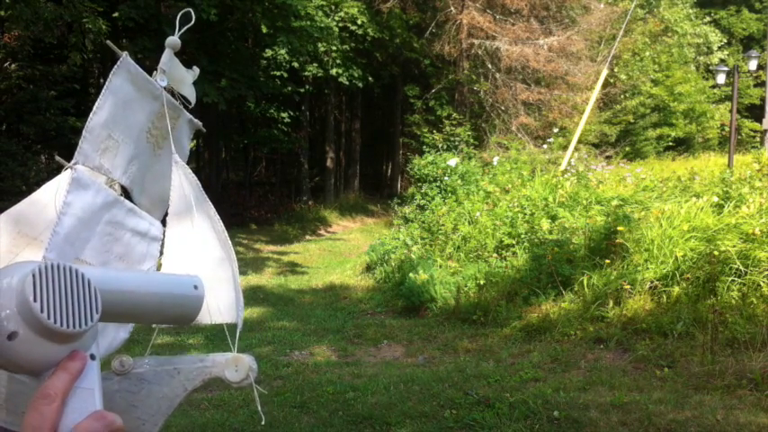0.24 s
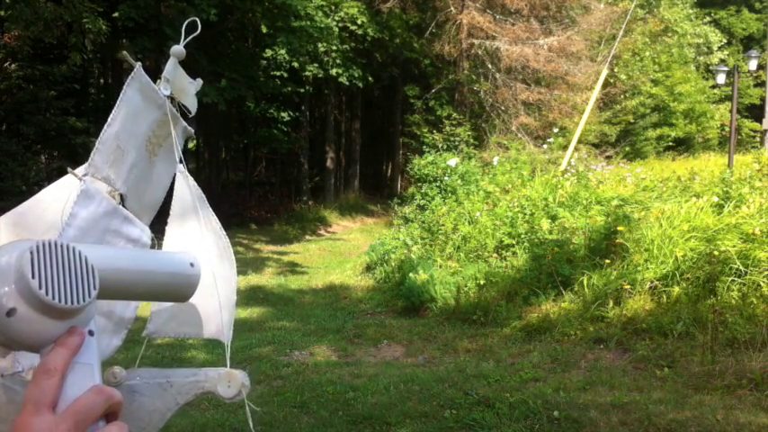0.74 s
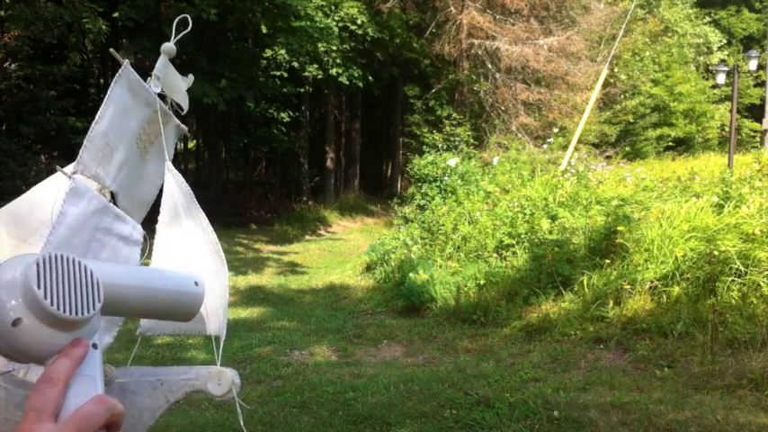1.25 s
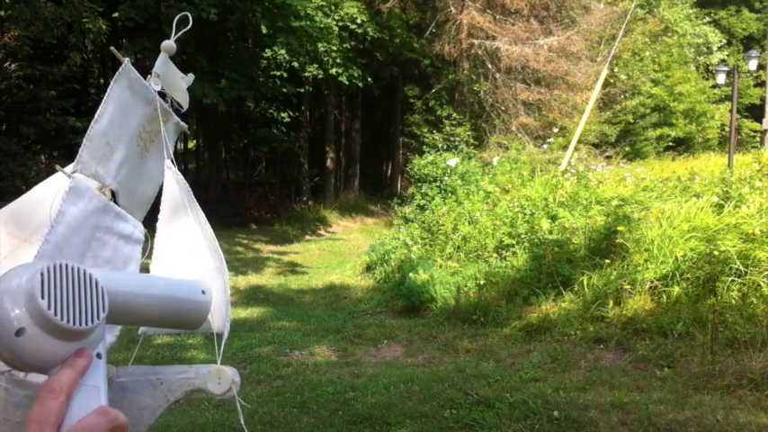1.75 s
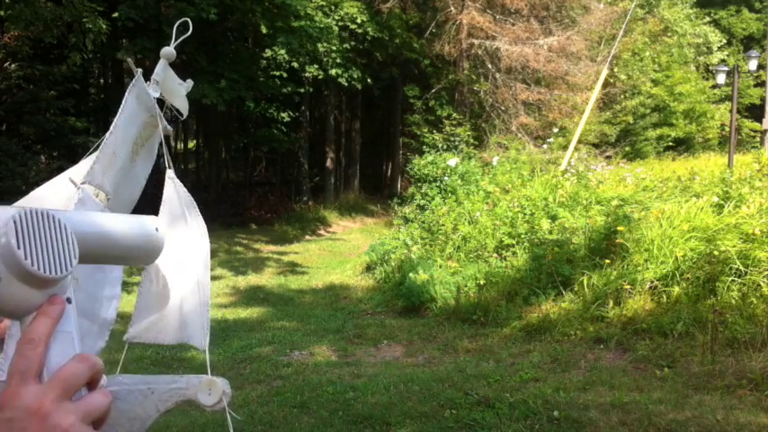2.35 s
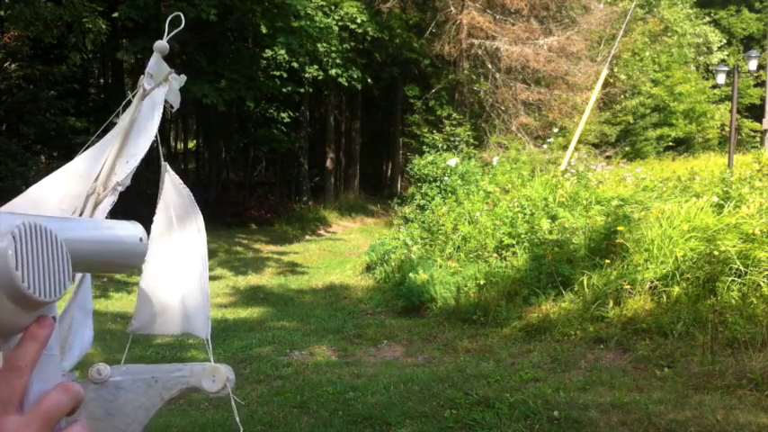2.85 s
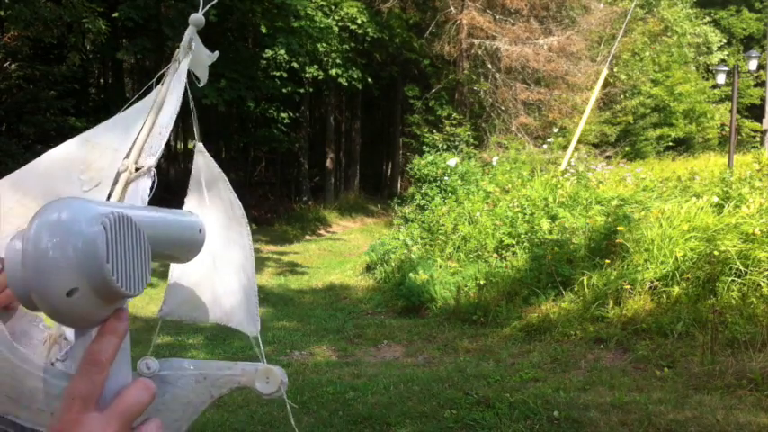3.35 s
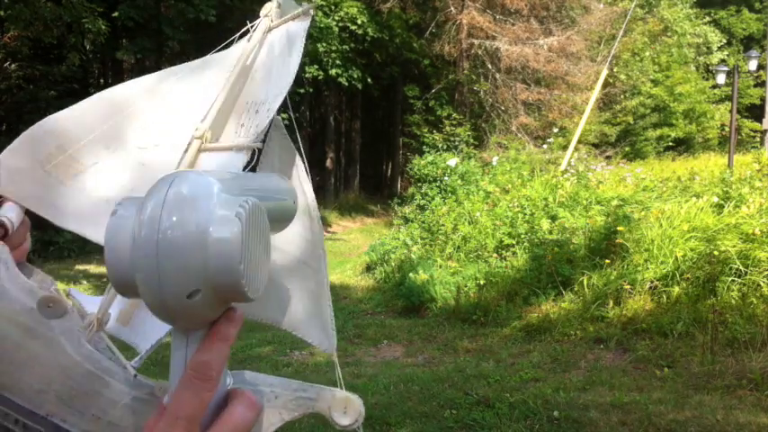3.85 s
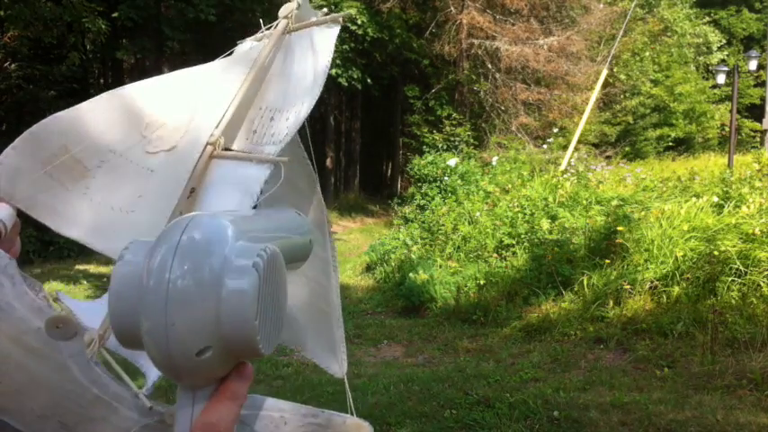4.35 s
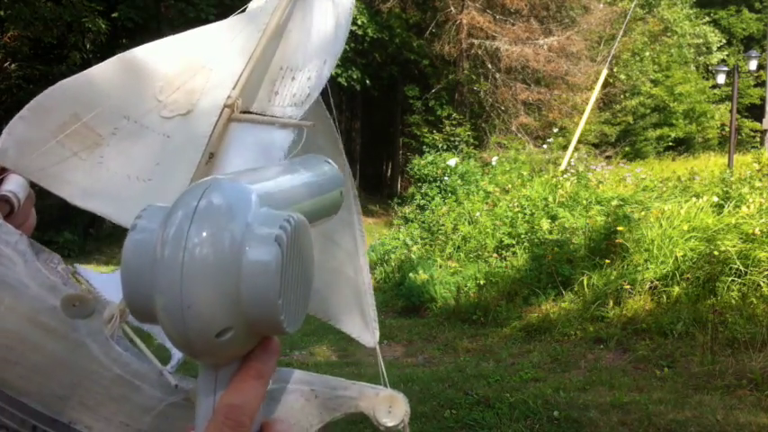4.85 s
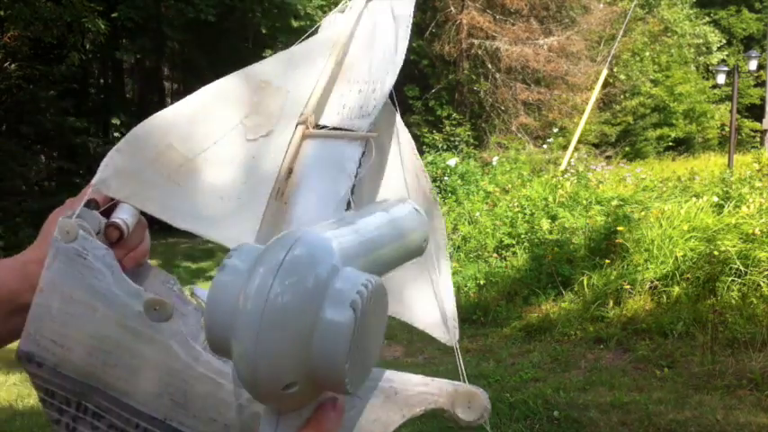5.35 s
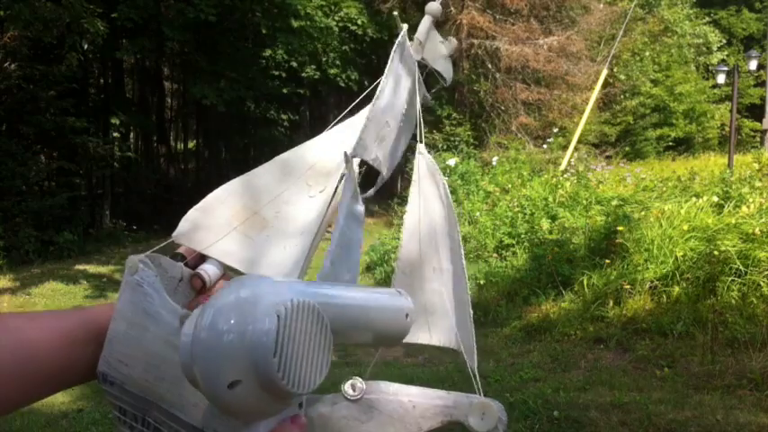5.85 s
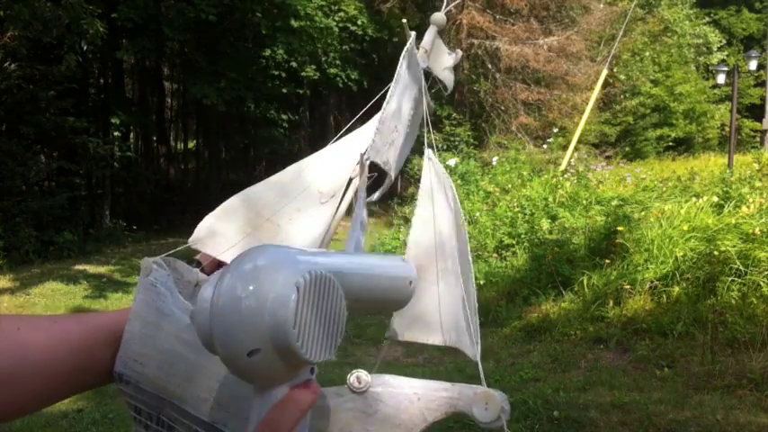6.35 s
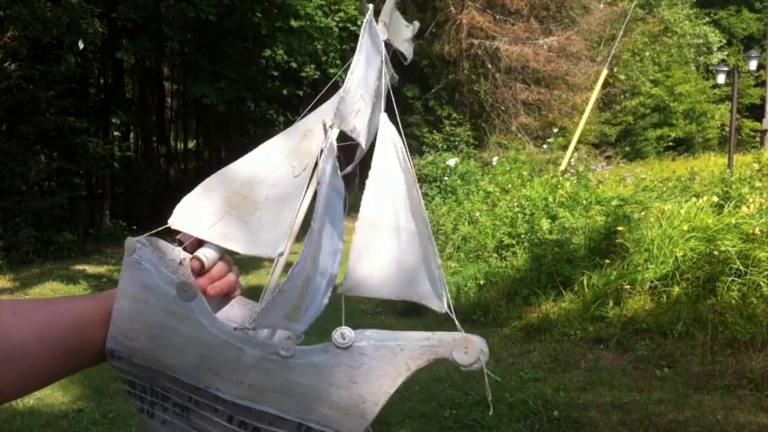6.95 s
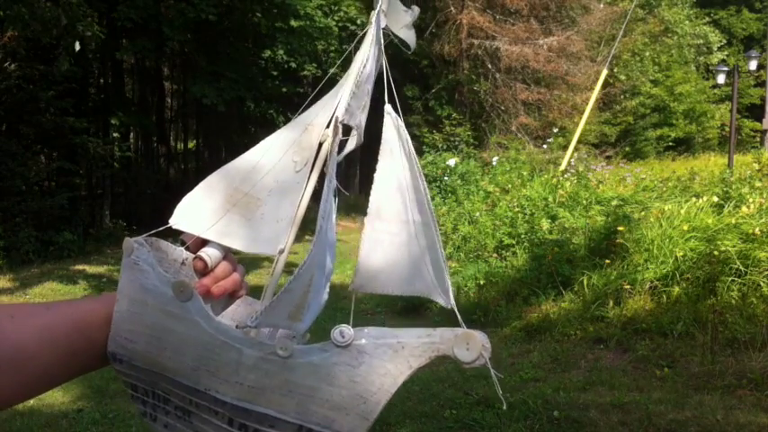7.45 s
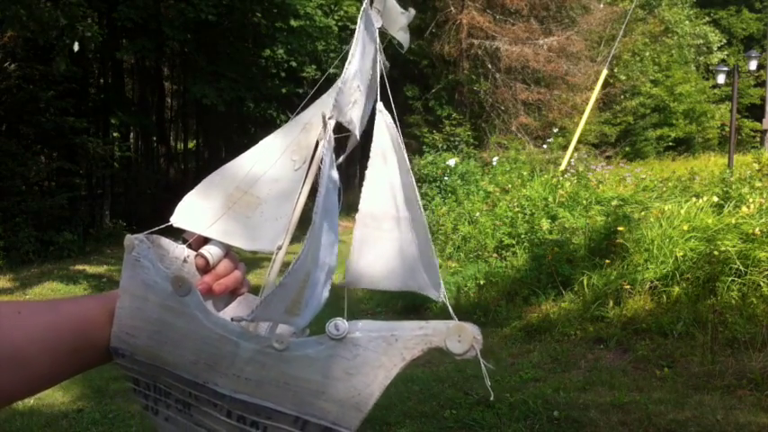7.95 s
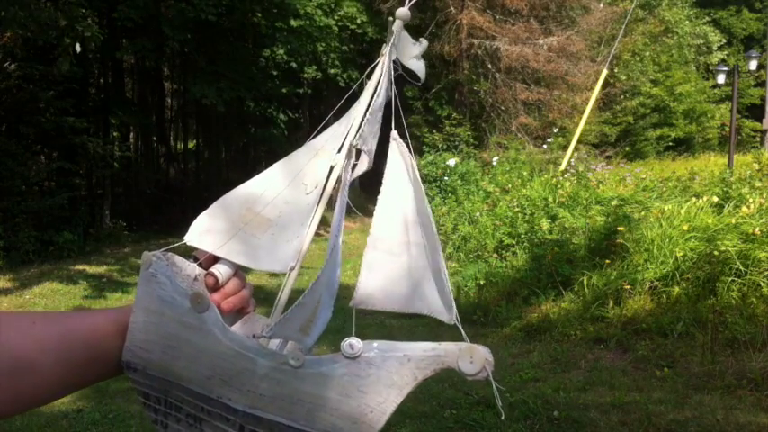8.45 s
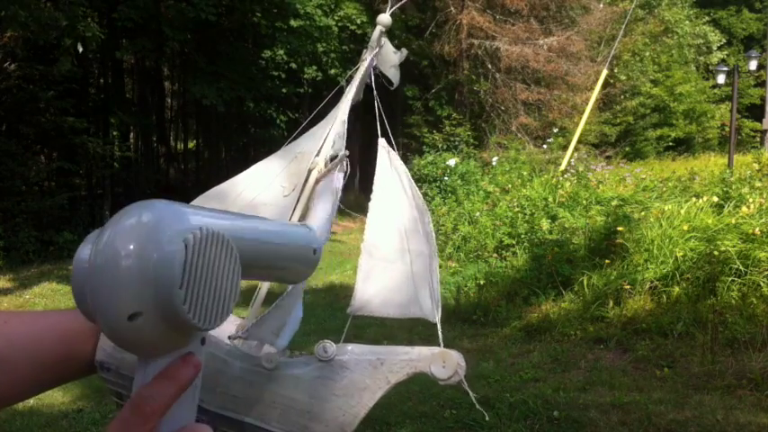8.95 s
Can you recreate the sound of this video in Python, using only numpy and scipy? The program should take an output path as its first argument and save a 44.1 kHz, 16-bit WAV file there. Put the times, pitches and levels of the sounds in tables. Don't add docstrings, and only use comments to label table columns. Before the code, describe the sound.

A handheld hair dryer rushes and whines close by, its tone shifting as it turns, winds down, then snaps back on outdoors.

```python
import sys
import numpy as np
from scipy import signal
from scipy.fft import rfft, irfft, next_fast_len
from scipy.io import wavfile
from scipy.ndimage import uniform_filter1d, map_coordinates

SR = 44100
rng = np.random.default_rng(int(sys.argv[2]) if len(sys.argv) > 2 else 0)


def log_audio(samples):
    frames = np.atleast_2d(samples).T
    limited = np.clip(frames, -1, 1)
    pcm = np.round(limited * 32767).astype(np.int16)
    wavfile.write(sys.argv[1], SR, pcm)


def decibels_to_gain(level_db):
    exponent = np.asarray(level_db, float) / 20
    return 10 ** exponent


N = 405279
TOP_HZ = 15740
RUN_HZ = 178.05


def unit(x):
    return x / np.sqrt(np.mean(x ** 2) + 1e-20)


def along(points, hz):
    point_hz, values = np.transpose(points)
    return np.interp(np.log(hz + 1), np.log(point_hz + 1), values)


def curves(rows, t):
    times, *columns = np.transpose(rows)
    return [np.interp(t, times, column) for column in columns]


def wobble(rate):
    knots = rng.standard_normal(int(N * 90 / SR) + 4)
    return map_coordinates(knots, [np.arange(N) * min(rate, 90) / SR])


def patches(shape, size):
    field = rng.standard_normal(shape)
    for axis in (0, 1, 0, 1):
        field = uniform_filter1d(field, size[axis], axis)
    return unit(field)


def shaped_noise(gain_at):
    m = next_fast_len(N)
    spectrum = rfft(rng.standard_normal(m)) * gain_at(np.fft.rfftfreq(m, 1 / SR))
    return unit(irfft(spectrum, m)[:N])


# pitch_hz, level_db (per Hz)
LEAVES = [(25, -45), (50, -26), (100, -4.5), (250, -3), (800, -10), (2300, -10), (5300, -24), (8500, -7),
          (15700, -21)]
# start_s, peak_db, pitch_hz
CRICKET_NOTES = [(8.0311, -39, 5300), (8.0464, -39, 5180), (8.0721, -36, 5850), (8.106, -37, 5400),
                 (8.1244, -43, 5270), (8.1534, -38, 5820), (8.1624, -44, 5410), (8.2167, -43, 5430),
                 (8.2442, -43, 5250), (8.2824, -46, 5190), (8.3165, -36, 5440), (8.3514, -40, 5390),
                 (8.4188, -39, 5850)]


def garden():
    out = decibels_to_gain(-48) * shaped_noise(lambda hz: decibels_to_gain(along(LEAVES, hz)))
    chorus_hz, width_hz = 5450, 280
    chorus = shaped_noise(lambda hz: np.exp(-0.5 * ((hz - chorus_hz) / width_hz) ** 2))
    out += decibels_to_gain(-59 + 4.4 * wobble(28)) * chorus
    t = np.arange(round(0.019 * SR)) / SR
    for start_s, peak_db, pitch_hz in CRICKET_NOTES:
        note = np.hanning(len(t)) * np.sin(2 * np.pi * pitch_hz * (t - 1.2 * t * t))
        out[round(start_s * SR):][:len(t)] += decibels_to_gain(peak_db - 8) * note
    return out


# start_s, peak_db
CONTACTS = [
    (8.3903, -24),
    (8.3918, -22),
]


def switch():
    out, t = np.zeros(N), np.arange(SR // 20) / SR
    for start_s, peak_db in CONTACTS:
        crack = 0.51 * decibels_to_gain(-60 * t / 0.006) * np.diff(rng.standard_normal(len(t) + 1))
        knock = 0.17 * decibels_to_gain(-60 * t / 0.018) * np.sin(2 * np.pi * 700 * t)
        out[round(start_s * SR):][:len(t)] += decibels_to_gain(peak_db) * (crack + knock)
    return out


def shaft(t):
    off_s, coast_s, on_s, spin_up_s = 7.587, 0.28, 8.39, 0.15
    run_hz = RUN_HZ - 0.175 * t
    coast = 1 / (1 + np.clip(t - off_s, 0, on_s - off_s) / coast_s)
    missing = (1 - coast) * np.exp(-np.maximum(t - on_s, 0) / spin_up_s)
    return run_hz * (1 - missing)


# time_s, turn (intake 0 side-on, 1 slanted, 2 facing, 3 lowered),
# aimed (barrel along the line of sight, 0-1), sail_echo_lag_ms, echo_strength (0-1)
HAND_PATH = [(0, 0, 0, 0.33, 0.2), (.7, 0.1, 0.28, .28, 0), (2.2, 0.18, 0.35, .285, 0.07),
             (2.7, 0.3, 0.4, 0.444, .25), (3.1, .5, 0.2, 0.47, 0.1), (3.5, 1.3, 0.67, .468, 0.3),
             (3.85, 2.27, 0.5, .535, 0.1), (4.4, 2.5, 0.8, 0.45, 0), (5.0, 2.5, 1, 0.56, .3),
             (5.5, 2.5, 0.88, 0.53, 0.3), (5.8, 2.1, 0.7, 0.6, 0.1), (6.1, 0.9, 0.1, 0.43, 0.2),
             (6.6, 1.1, 0.4, 0.49, .2), (6.9, 1.85, 0.07, 0.5, 0.16), (7.2, 2.5, 0.93, 0.51, 0),
             (8.5, 4.5, 0.8, 0.42, 0), (8.8, 2.46, 0.53, 0.35, 0.1), (9.19, 0.5, 0.14, 0.29, 0.2)]


def by_turn(values, t):
    turn = np.clip(curves(HAND_PATH, t)[0], 0, 3)
    shares = [np.clip(1 - abs(turn - k), 0, 1) for k in range(len(values))]
    return sum(np.multiply.outer(value, share) for value, share in zip(values, shares))


# time_s, gain_db
NEARNESS = [(0, 0), (3.2, 0), (4.5, 0), (5.8, 0), (6.72, 0), (6.87, 1), (7.1, 0), (8.3, -1.5), (8.5, -1),
            (8.8, 3), (9.19, 1.5)]


def near_db(t):
    return curves(NEARNESS, t)[0]


# multiple (of the shaft speed), side_on_db, slanted_db, facing_db, lowered_db
STRONG_TONES = [
    (1, -54, -44, -46, -46),
    (12, -25, -27, -30, -24),
    (24, -27.5, -39, -38, -37),
    (40, -56, -31, -37, -43),
]
STRONG_AIMED_GAIN = [
    6.5,
    -2,
    1.5,
    1,
]
# multiple (of the shaft speed), side_on_db, slanted_db, facing_db, lowered_db
WEAK_TONES = [(5, -51, -34, -54, -41), (6, -47, -43, -55, -49), (13, -38, -37, -48, -34),
              (30, -38, -45, -49, -42), (33, -40, -56, -50, -60), (34, -41, -42, -47, -55),
              (35, -40, -42, -42, -48), (39, -52, -48, -43, -51), (41, -50, -43, -51, -63),
              (45, -45, -47, -48, -52), (54, -44, -50, -53, -58), (55, -51, -46, -48, -51),
              (60, -39, -48, -52, -71), (65, -59, -40, -46, -64), (2, -50, -50, -50, -50)]


def motor():
    t = np.arange(N) / SR
    shaft_hz, aimed = shaft(t), curves(HAND_PATH, t)[1]
    unsteady_hz = shaft_hz + 0.2 * wobble(12) + 0.15 * wobble(2.5)
    phase = 2 * np.pi * np.cumsum(unsteady_hz) / SR
    decades = np.log10(shaft_hz / RUN_HZ)
    out = np.zeros(N)
    for (multiple, *seen_db), aimed_db in zip(STRONG_TONES, STRONG_AIMED_GAIN):
        flicker_db = (0.8 + (multiple / 24) ** 2) * wobble(5)
        scattered = 0.36 * (multiple > 1) * (wobble(70) + 1j * wobble(70))
        level_db = by_turn(seen_db, t) + aimed_db * aimed + near_db(t) + 110 * decades + flicker_db
        wave = np.real((1 + scattered) * np.exp(1j * multiple * phase))
        out += np.sqrt(2) * decibels_to_gain(level_db) * wave
    for multiple, *seen_db in WEAK_TONES:
        level_db = by_turn(seen_db, t) + 70 * decades + 2.5 * wobble(14)
        wave = np.sin(multiple * phase + 2 * np.pi * rng.random())
        out += np.sqrt(2) * decibels_to_gain(level_db) * wave
    return out


def echoes(hz, t):
    shape, size = (len(hz), len(t)), (3, 13)
    scatter = 0.25 * np.clip(hz / 9000, 0.3, 1.3)[:, None]
    scattered = scatter * (patches(shape, size) + 1j * patches(shape, size))
    gain = abs(1 + scattered) / np.sqrt(1 + 2 * scatter ** 2)
    lag_ms, strength = curves(HAND_PATH, t)[2:]
    reflected = (hz ** 2 / (hz ** 2 + 4000 ** 2))[:, None]
    echo = np.clip(strength, 0, 0.9) * decibels_to_gain(1.2 * patches(shape, size=(12, 30))) * reflected
    delayed = echo * np.exp(-2j * np.pi * hz[:, None] * lag_ms / 1000)
    return gain * abs(1 - delayed) / np.sqrt(1 + echo ** 2)


# middle_s, length_s, pitch_hz, gain_db (negative dips)
SWELLS_AND_DIPS = [(4.08, 1.46, 2230, 13), (6.95, 0.23, 2270, 6), (7.3, 0.64, 2260, 9), (9.1, 0.29, 2200, 2),
                   (3.73, 1.4, 980, 7.5), (6.36, 1.4, 920, 4.5), (7.93, 0.69, 1070, 10), (8.62, 0.39, 1080, 10.5),
                   (9.1, 0.31, 1030, 5), (6.65, 0.47, 1580, 5.5), (8.9, 0.29, 1500, 4), (5.5, 0.53, 1330, 4),
                   (2.9, 4, 1820, -8), (6.3, 0.43, 2700, 7), (6.92, .3, 4570, 8.5), (4.3, 3.9, 4820, 3),
                   (5.4, 0.51, 3100, 7), (3.79, .32, 7600, -13), (8.02, .55, 1480, 2.5), (1.2, 2.7, 7070, -7),
                   (0.89, 2.9, 10000, -5), (3, 0.88, 6300, -11), (4.75, .7, 7600, 0), (5.28, 0.45, 8800, -6),
                   (3.8, 1.8, 3620, -6), (5.5, 0.74, 5700, 7.5), (3.3, 0.35, 10700, -7), (4.3, 0.36, 11800, -1),
                   (8.5, 0.23, 2300, -3), (7.85, 0.36, 2200, 6)]


def sweeps(hz, t):
    total_db = 0
    for middle_s, length_s, peak_hz, gain_db in SWELLS_AND_DIPS:
        passing = np.sqrt(abs(np.cos(np.pi * np.clip((t - middle_s) / length_s, -0.5, 0.5))))
        width_hz = 53 + 0.0087 * peak_hz
        total_db = total_db + gain_db * passing / (1 + ((hz[:, None] - peak_hz) / width_hz) ** 2)
    return decibels_to_gain(total_db)


CASING_PITCHES = [600, 930, 1150, 1500, 1900, 2280, 2700, 3100, 3800, 4750, 5600, 7000, 10300, 15200]
CASING_COLOURS = [
    (-11, -4, -0.5, 0, -9, -0.5, -7.5, -8, -12.5, -11.5, -7.5, -12.5, -13.5, -18),
    (-7.5, -5.5, -8.5, 1, -5, -3, -7.5, -7, -6.5, -7.5, -6.5, -11.5, -11.5, -14),
    (-15.5, -14.5, -10, 0.14, -7.5, -8, -11, -13.5, -17, -16, -19.5, -17.5, -21.5, -20),
    (-14, -13.5, -6, 0, -18.5, -18, -23, -16.5, -13, -15, -17.5, -20, -24, -30),
    (-10, -15, -4.5, 0.087, -18, -14, -16, -18, -19.5, -15, -20, -16.5, -24.5, -29),
]
# pitch_hz, gain_db
MICROPHONE_BASS = [(25, -62), (50, -56), (100, -35.5), (160, -8), (250, -3), (400, -3), (600, 1.5)]
AIR_BORDERS = [1050, 1900, 2700]
# side_on_db, slanted_db, facing_db, lowered_db
AIR_LEVELS = [
    (-21.5, -24, -23, -22.5),
    (-21, -22, -21, -20.5),
    (-23.5, -19.5, -21.5, -13.5),
    (-16.5, -17, -16, -17.5),
]
AIR_AIMED_GAIN = [
    -1,
    7,
    -6.5,
    -1.5,
]
AIR_GROWTH = [
    41.5,
    60,
    78,
    60.3,
]


def air():
    hz, t, noise = signal.stft(rng.standard_normal(N), SR, nperseg=1024, noverlap=768)
    slow = np.clip((165 - shaft(t)) / 70, 0, 1)
    *seen_db, slow_db = [along(list(zip(CASING_PITCHES, row)), hz) for row in CASING_COLOURS]
    colour_db = (1 - slow) * by_turn(seen_db, t) + slow * slow_db[:, None]
    colour_db = colour_db + along(MICROPHONE_BASS, hz)[:, None]
    colour = decibels_to_gain(2 * colour_db) * (hz < TOP_HZ)[:, None]
    above = [1 / (1 + (border / (hz + 1)) ** 16) for border in AIR_BORDERS]
    shares = -np.diff([np.ones_like(hz), *above, np.zeros_like(hz)], axis=0)[..., None]
    aimed = curves(HAND_PATH, t)[1]
    decades = np.log10(shaft(t - 0.0096) / RUN_HZ)
    power = 0
    for seen, aimed_db, growth, share in zip(AIR_LEVELS, AIR_AIMED_GAIN, AIR_GROWTH, shares):
        level_db = by_turn(seen, t) + near_db(t) + aimed_db * aimed + growth * decades
        part = share * colour
        power = power + decibels_to_gain(2 * level_db) * part / np.mean(part, axis=0)
    eddy_db = 0.62 * patches(noise.shape, size=(14, 8))
    flutter_db = 0.2 * patches(noise.shape, size=(300, 5))
    gain = np.sqrt(power) * echoes(hz, t) * sweeps(hz, t) * decibels_to_gain(eddy_db + flutter_db - 0.53)
    return signal.istft(noise * gain, SR, nperseg=1024, noverlap=768)[1][:N]


def scene():
    return np.tile(garden() + switch() + motor() + air(), (2, 1))


# middle_s, low_edge_hz
SIDE_BURSTS = [(.58, 12400), (.69, 4600), (.69, 8600), (.69, 11000), (.9, 5300), (.9, 12000), (1.24, 5700),
               (1.24, 8900), (1.53, 6900), (1.575, 7600), (1.73, 7900), (1.85, 6200), (1.85, 12400),
               (2.31, 10300), (2.78, 7200), (2.78, 11700), (2.915, 13800), (3.215, 8200), (3.215, 10600),
               (3.73, 8900), (4.26, 9300), (5.75, 8200), (6.84, 5700), (6.84, 14000), (7.35, 14200),
               (8.68, 6900), (8.96, 4200), (8.96, 11700), (8.985, 9600)]


def fills():
    out, size = np.zeros(N), 1700
    hz = np.fft.rfftfreq(size, 1 / SR)
    for middle_s, low_hz in SIDE_BURSTS:
        band = (hz > low_hz) * (hz < low_hz + 1600)
        burst = unit(irfft(rfft(rng.standard_normal(size)) * band, size))
        level_db = -24.5 - 0.5 * low_hz / 1000
        out[round(middle_s * SR) - size // 2:][:size] += decibels_to_gain(level_db) * burst * np.hanning(size)
    return np.array([out, -out])


def roll_off(x):
    return signal.sosfilt(signal.butter(12, 17060, fs=SR, output="sos"), x)


def record(dry):
    held = dry / (1 + abs(dry) ** 6) ** (1 / 6) + fills()
    m = next_fast_len(N)
    in_band = np.fft.rfftfreq(m, 1 / SR) < TOP_HZ
    mix = irfft(rfft(held, m) * in_band, m)[:, :N]
    return roll_off(mix)


dry = scene()
out = record(dry)
log_audio(out)
```